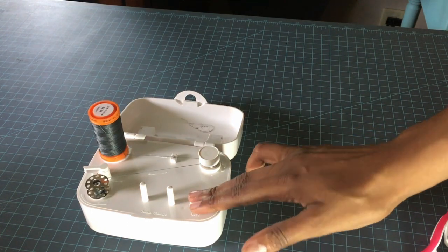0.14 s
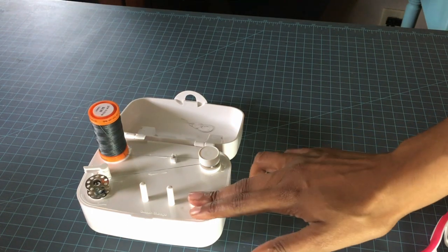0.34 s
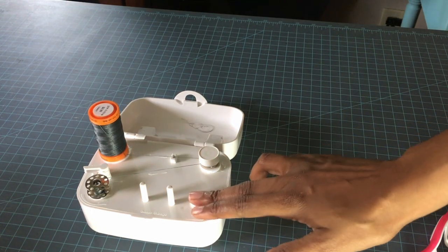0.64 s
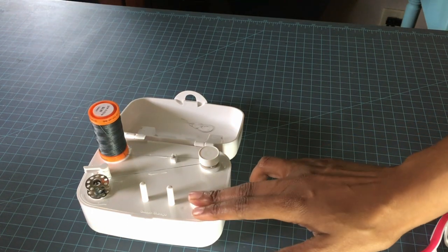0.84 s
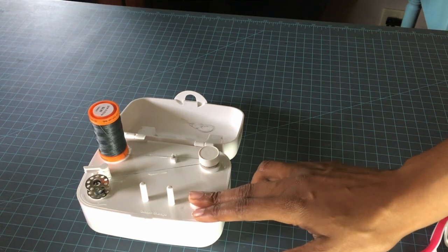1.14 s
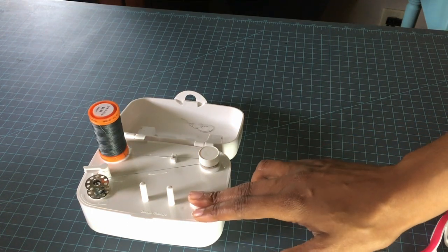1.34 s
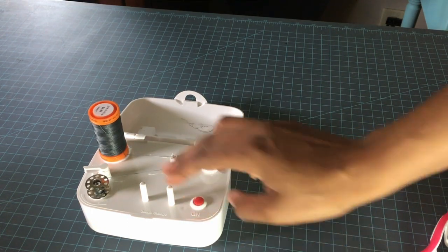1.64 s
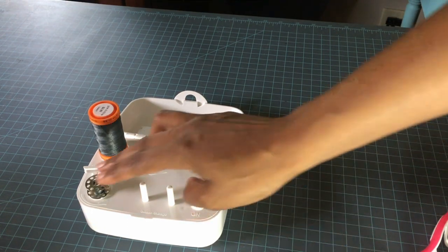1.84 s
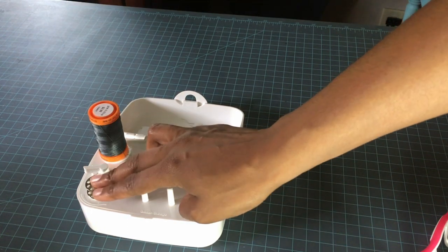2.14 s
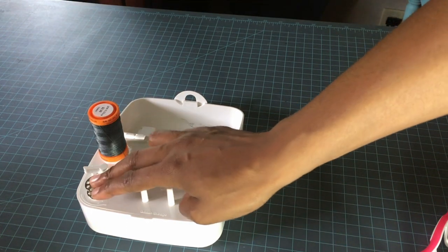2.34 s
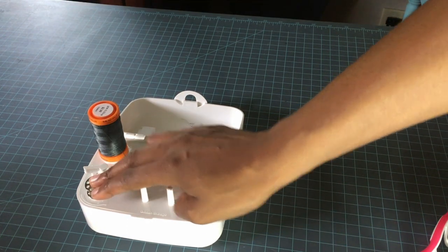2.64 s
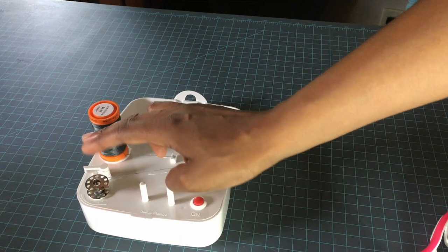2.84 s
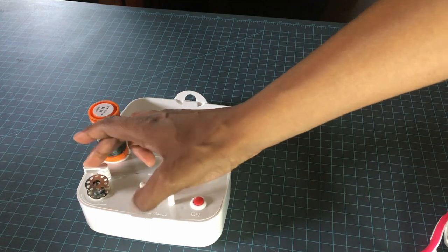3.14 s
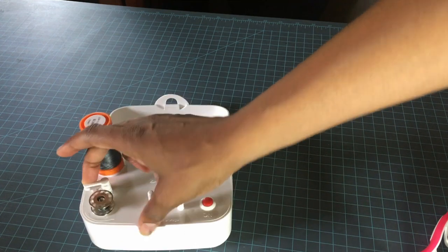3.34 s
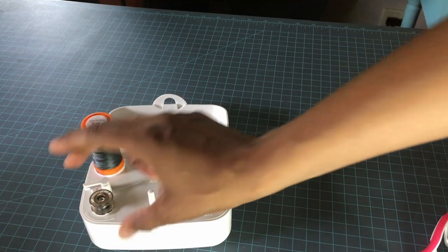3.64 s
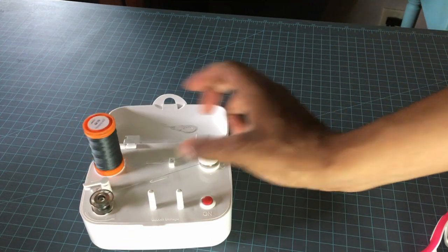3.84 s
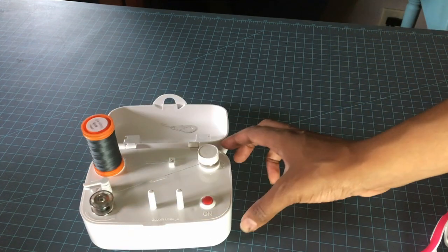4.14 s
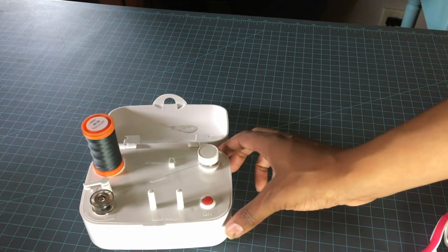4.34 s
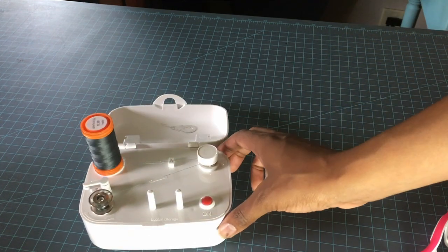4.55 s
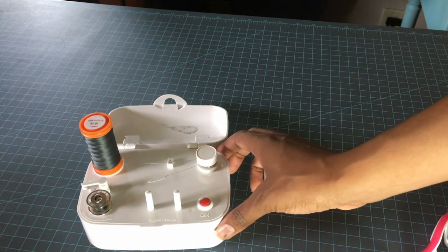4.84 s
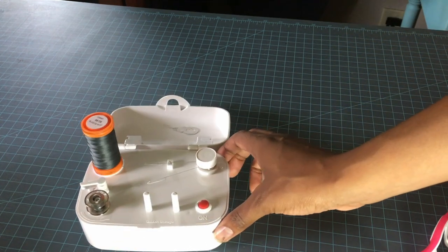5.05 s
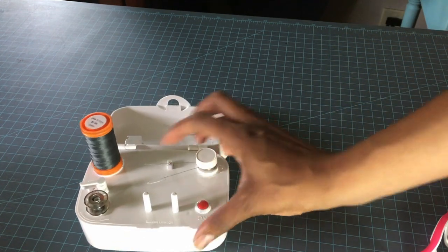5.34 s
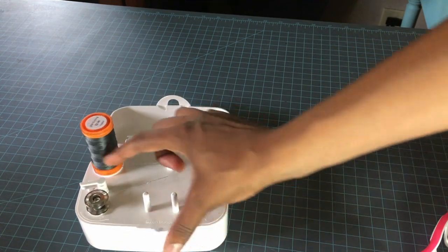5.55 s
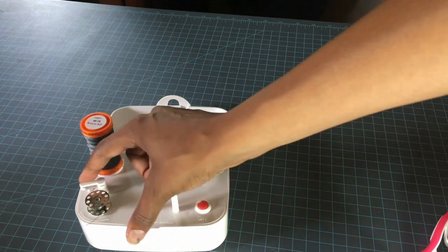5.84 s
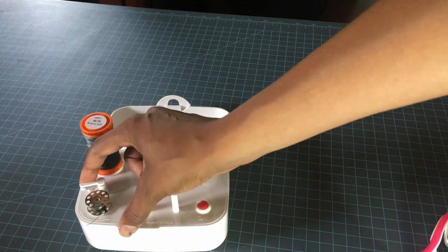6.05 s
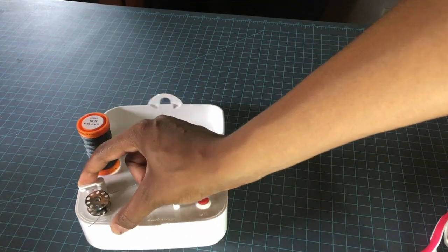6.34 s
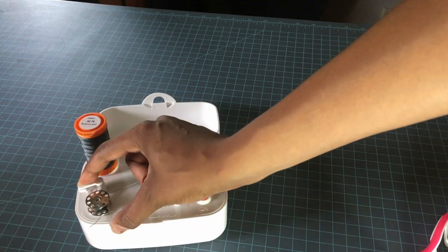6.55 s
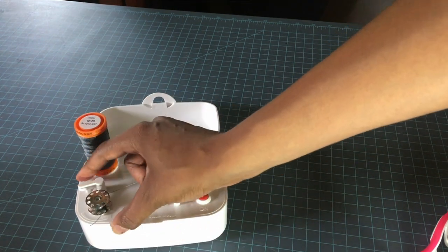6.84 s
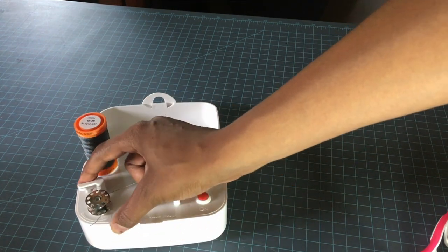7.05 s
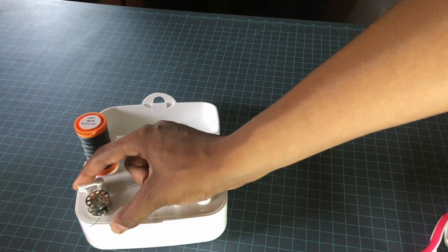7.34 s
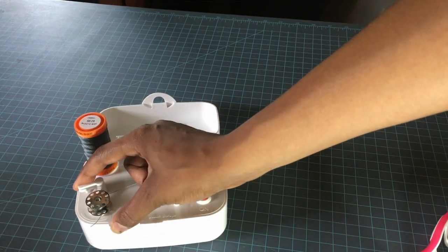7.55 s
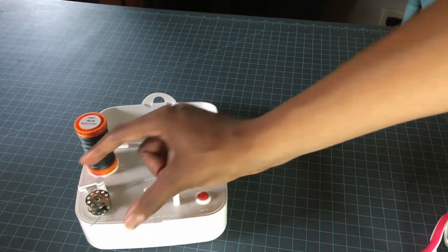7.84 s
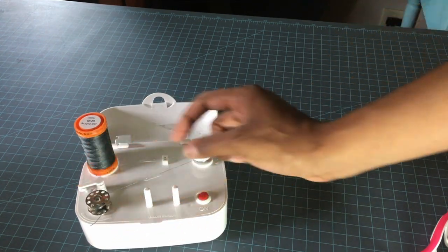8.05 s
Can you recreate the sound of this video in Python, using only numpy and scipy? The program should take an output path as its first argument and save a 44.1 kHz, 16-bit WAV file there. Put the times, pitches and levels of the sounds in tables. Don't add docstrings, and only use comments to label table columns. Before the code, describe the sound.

Close up on a table in a quiet room, a button on a hollow plastic casing clicks sharply four times, with fainter clicks between. Soft fingertip touches follow, then a small geared motor starts slowly, speeds up to a rough buzzing whirr with a loose bobbin snapping, drops to a weaker idle and stops. Afterwards come a brief scrape on the mat and a few light lever clicks.

```python
import sys
import numpy as np
from scipy import signal
from scipy.fft import rfft, irfft, next_fast_len
from scipy.io import wavfile
from scipy.ndimage import uniform_filter1d

SR = 44100
rng = np.random.default_rng(int(sys.argv[2]) if len(sys.argv) > 2 else 0)


def magnitude_from_level(level_db):
    exponent = np.asarray(level_db, float) / 20
    return 10 ** exponent


def dump_mix(stems):
    frames = np.atleast_2d(stems).T
    limited = np.clip(frames, -1, 1)
    pcm = np.round(limited * 32767).astype(np.int16)
    wavfile.write(sys.argv[1], SR, pcm)


N = 361619
LEAD = SR // 4

# pitch_hz, width_hz, knocked_db, shaken_by_motor_db
CASING = [(282.8, 36, -5.5, -2.5), (477, 120, -17.5, -23.5), (796, 88, -4.5, -9.5), (927, 160, 6, -9.5),
          (1060, 210, -14, -5.5), (1123.5, 75, -8, -2), (1320, 26, -6, 2.5), (1644, 81, -3.5, -12),
          (1745, 70, -4, -6), (2022, 37, -9.5, 0), (2200, 54, -10, -1), (2456, 54, -6.5, -3.5),
          (2858, 60, -10.5, -2), (3334, 110, -7, -9), (4120, 160, -4.5, -42.5), (5020, 430, 1, -17.5),
          (5663, 250, 3.5, -12), (5800, 430, -1, -30), (7470, 250, -1, -20.5), (8100, 350, -3.5, -23.5),
          (10100, 350, -4.5, -20), (11000, 2700, -16, -25.5)]
# pitch_hz, density_db_per_hz
WHIRR_COLOUR = [(100, -65), (170, -32.5), (283, -5.5), (369, -11), (518, -5.5), (614, -16), (1040, -6.5),
                (1840, -6.5), (3690, -15.5), (8470, -21), (15500, -43.5)]
# time_s, depth_db
THROB_DEPTH = [
    (3.5, 0),
    (3.75, 0.5),
    (4.0, 0),
    (4.45, 0.5),
    (4.7, -0.5),
]
THROB_HZ, THROB_PEAK_S = 11.96, 4.09
FLARE_HZ, FLARE_DB, FLARE_PEAK_S = 1730, 10, 4.115
WAKING_HZ, WAKING_DB = 1320, 6
BASS_WAKES_S, BASS_WAKE_LENGTH_S, BASS_LATE_DB = 3.58, 0.1, -3
BROAD_LATE_DB = -2


def motor():
    casing_db, rattle_db, hum_db = running()
    waking = in_time([(BASS_WAKES_S, 1), (BASS_WAKES_S + BASS_WAKE_LENGTH_S, 0)])[0]
    t = np.arange(N) / SR
    turn = 2 * np.pi * THROB_HZ * (t - THROB_PEAK_S)
    throb_db = in_time(THROB_DEPTH)[0] * (np.cos(turn) + 1.1 * np.cos(2 * turn))
    throb_db += 1.68 * (1 - 0.7 * waking) * drift(28)
    flare_db = FLARE_DB * np.cos(2 * np.pi * THROB_HZ * (t - FLARE_PEAK_S))

    shake = grit(16000, spread_db=3.0)
    rings = 0
    for k, (hz, width, _, shaken_db) in enumerate(CASING):
        near_flare = np.exp(-(np.log(hz / FLARE_HZ) / 0.11) ** 2)
        near_waking = np.exp(-(np.log(hz / WAKING_HZ) / 0.08) ** 2)
        uneven_db = 2.3 * drift(5.1) + 2.85 * drift(45)
        panel_db = uneven_db + flare_db * near_flare + WAKING_DB * waking * near_waking
        rings = rings + (-1) ** k * magnitude_from_level(panel_db) * resonate(shake, [(hz, width, shaken_db)])

    broad = coloured(grit(16000, spread_db=1.5), WHIRR_COLOUR)
    body = rms_one(rings) + magnitude_from_level(BROAD_LATE_DB * waking) * broad
    low, high = split(body, 3500)
    bass, middle = split(low, 630, order=2)
    low = magnitude_from_level(BASS_LATE_DB * waking) * bass - middle
    whirr = rms_one(low) + magnitude_from_level(rattle_db) * rms_one(high)
    return magnitude_from_level(casing_db - 0.5 + throb_db) * whirr, magnitude_from_level(hum_db + 1.74) * table_hum()


# time_s, level_db
LOAD = [
    (3.282, -53.5),
    (3.43, -55.5),
    (3.66, -46.5),
    (3.95, -41.5),
    (4.4, -41.5),
    (4.65, -43.5),
    (4.71, -50),
    (5.269, -52.5),
    (5.73, -55.5),
]
# peak_s, level_db, half_length_s
CATCHES = [(3.46, 11.5, 0.15), (3.59, 0.5, 0.044), (3.752, 2, 0.048), (3.828, -5.5, 0.034),
           (3.948, 5, 0.02), (4.2, 2, 0.034), (4.28, 3, 0.026), (4.375, 5.5, 0.025), (4.98, 2, 0.046),
           (5.09, -1, 0.1), (5.23, 2.5, .05), (5.322, -10, 0.044), (5.408, 7, 0.038), (5.65, -13.5, 0.048)]
SPIN_UP_DB_PER_S, RUN_DOWN_DB_PER_S = 484.5, 165.5
RATTLE_DB, RATTLE_LAG = -14.5, 0.3
SQUEAL_S, SQUEAL_DB, SQUEAL_HALF_S = 3.34, 10, 0.062
TABLE_HUM_DB, TABLE_HUM_SHARE = -28.5, 0.64
BEAT_HZ, BEAT_PEAK_S, BEAT_DB, BEAT_FADE_S = 7.23, 3.8, 5, 0.6


def running():
    t, start, stop = np.arange(N) / SR, LOAD[0][0], LOAD[-1][0]
    load_db, = in_time(LOAD)
    ends_db = -SPIN_UP_DB_PER_S * np.maximum(start - t, 0) - RUN_DOWN_DB_PER_S * np.maximum(t - stop, 0)
    catch_db = sum(swell(s, db, half, half) for s, db, half in CATCHES)
    squeal_db = swell(SQUEAL_S, SQUEAL_DB, SQUEAL_HALF_S, SQUEAL_HALF_S)
    rattle_db = RATTLE_DB - RATTLE_LAG * catch_db + squeal_db
    beat_fade = np.exp(-np.maximum(t - start, 0) / BEAT_FADE_S)
    beat_db = BEAT_DB * beat_fade * np.cos(2 * np.pi * BEAT_HZ * (t - BEAT_PEAK_S))
    hum_db = TABLE_HUM_DB + TABLE_HUM_SHARE * load_db + beat_db + ends_db
    return load_db + catch_db + ends_db, rattle_db, hum_db


# start_s, peak_db
SNAPS = [(3.3992, -47), (3.497, -52), (3.6277, -48), (3.7419, -52.5), (3.9444, -39), (4.1051, -40),
         (4.1944, -43), (4.2844, -44), (4.364, -36), (4.4594, -42), (4.5544, -39), (4.722, -43),
         (5.4194, -49)]


def snaps():
    out, t = np.zeros(N), np.arange(SR // 40) / SR
    for s, db in SNAPS:
        out[round(s * SR):][:len(t)] += magnitude_from_level(db - 3.5) * np.exp(-t / 0.0017) * rng.standard_normal(len(t))
    bright = split(out + 1e-18, 4010, order=2)[1]
    return split(bright, 9200, order=3)[0]


SNAP_ABOVE_HZ = 2300


def knocks():
    out, t = np.zeros((2, N + LEAD + SR)), np.arange(SR // 16) / SR
    hz, width, level_db = np.transpose(CASING)[:3, :, None]
    for s, peak_db, own_hz, low_db, high_db, _ in contacts():
        luck = rng.standard_normal((3, len(CASING), 1))
        late = np.maximum(t - 0.0018 * abs(luck[0]), 0)
        waves = magnitude_from_level(level_db) * np.sign(luck[2]) * np.sin(2 * np.pi * hz * late)
        own = np.sin(2 * np.pi * own_hz * t)
        crack = np.exp(-t / 0.003) * rng.standard_normal(len(t))

        direct = (magnitude_from_level(1.9 * luck[1]) * waves * np.exp(-np.pi * 1.3 * width * late)).sum(0)
        direct += magnitude_from_level(4.0) * np.exp(-t / 0.0037) * own + magnitude_from_level(-2.5) * crack
        blurred = (waves * np.exp(-np.pi * 4 * width * late)).sum(0) + np.exp(-t / 0.002) * own
        blurred += magnitude_from_level(11.0) * np.exp(-t / 0.0005) * crack
        blurred += magnitude_from_level(-8.0) * np.exp(-t / 0.003) * own * (own_hz < SNAP_ABOVE_HZ)

        low, rest = split(np.array([direct, blurred]), 950)
        low = split(low, 390, order=2)[1]
        middle, high = split(rest, 2900)
        high = split(high, 10500, order=2)[0]
        soft_db = 0.92 * min(peak_db + 49.0, 0)
        high_gain = magnitude_from_level(np.array([[high_db + 7.5], [0.76 * high_db + 2.5]]) + soft_db)
        low_gain = magnitude_from_level(np.array([[low_db + 6.5], [0.79 * low_db + 1.5]]))
        sound = low_gain * low + middle + high_gain * high
        sound[1] *= np.sqrt(np.sum(sound[0] ** 2) / np.sum(sound[1] ** 2))
        at = round(s * SR) + LEAD
        out[:, at:at + len(t)] += magnitude_from_level(peak_db) * sound / abs(sound[0]).max()
    return out[:, :N + LEAD]


# start_s, peak_db, ring_hz, low_modes_db, high_modes_db
EARLIER_KNOCK = [
    (-0.082, -18, 1320, -25, -5.5),
]
# start_s, peak_db, ring_hz, low_modes_db, high_modes_db
CLICKS = [(0.18, -47.5, 2200, -39, -12), (0.229, -16, 2400, -12.5, -6), (0.28, -42, 2260, -1, -15),
          (0.314, -35.5, 1370, -8, -21), (0.922, -15.5, 1284, -14.5, -25.5),
          (1.262, -17, 2400, -13.5, -8.5), (1.504, -16.5, 1310, -12, -18.5),
          (1.554, -34.5, 1185, -13, -15.5), (2.463, -44, 1008, 15, -43), (2.533, -48.5, 870, -7.5, -15),
          (3.009, -34.5, 1780, -13, -14), (3.035, -44, 1790, -24, -28.5), (5.369, -40.5, 1450, -1, -21),
          (5.854, -42, 1363, -7, -35), (6.647, -40, 1255, -23, -58.5), (7.162, -46, 1320, -17.5, -18.5),
          (7.647, -28.5, 1320, -35.5, -31.5)]
# start_s, peak_db, ring_hz, table_thump_db
TOUCHES = [(0.098, -65.5, 865, -86), (0.563, -57.5, 800, -75.5), (0.571, -60, 1824, -74),
           (2.035, -61, 1220, -70.5), (2.411, -69.5, 844, -71.5), (2.719, -66, 940, -59.5),
           (2.763, -58.5, 890, -58), (2.778, -62, 1060, -76), (6.524, -64, 1450, -84),
           (6.541, -63.5, 1465, -76.5), (6.581, -65, 875, -71.5), (6.611, -60.5, 877, -72.5),
           (6.85, -72, 900, -82), (6.882, -64.5, 1350, -77.5), (7.036, -66.5, 1774, -84),
           (7.408, -65.5, 1300, -77), (8.189, -73, 937, -64.5)]
TOUCH_LOW_DB, TOUCH_HIGH_DB = -6, -16
THUMP_DB, THUMP_SHARE = -36, 0.52
SNAP_THUMP_DB = -11


def contacts():
    struck = []
    for s, peak_db, ring_hz, low_db, high_db in EARLIER_KNOCK + CLICKS:
        thump_db = THUMP_DB + THUMP_SHARE * (peak_db + low_db) + SNAP_THUMP_DB * (ring_hz > SNAP_ABOVE_HZ)
        struck.append((s, peak_db, ring_hz, low_db, high_db, thump_db))
    for s, peak_db, ring_hz, thump_db in TOUCHES:
        struck.append((s, peak_db, ring_hz, TOUCH_LOW_DB, TOUCH_HIGH_DB, thump_db))
    return sorted(struck)


# time_s, level_db
NUDGE = [
    (6.22, -98),
    (6.226, -77),
    (6.248, -84),
    (6.308, -60.5),
    (6.414, -57),
    (6.484, -100),
    (6.52, -79),
]
# pitch_hz, width_hz, level_db
NUDGE_RINGS = [(523, 54.2, -5.5), (1090, 22, -1), (1370, 37, 0.5), (2730, 82, -7.5), (2980, 52, -5),
               (5550, 22, -28), (7370, 150, -15.5), (8460, 100, -25), (10400, 63, -21), (11570, 79, -24.5)]


def nudge():
    before, after = (NUDGE[0][0] - 0.03, -120), (NUDGE[-1][0] + 0.028, -120)
    level_db, = in_time([before] + NUDGE + [after])
    slip = grit(6000, spread_db=2.5)
    broad = rms_one(resonate(slip, [(863, 880, 0.5), (7150, 3500, -14.0)]))
    feet = rms_one(rms_one(resonate(slip, NUDGE_RINGS)) + magnitude_from_level(-8) * broad)
    return magnitude_from_level(level_db - 3.0) * feet, magnitude_from_level(level_db - 10) * table_hum()


# start_s, top_db, panel_db
PUSHES = [(0.234, -44.5, -57), (0.613, -64, -69), (0.726, -68.5, -78), (1.458, -64, -64),
          (2.139, -69.5, -81), (2.384, -55, -80), (2.643, -75, -68), (2.909, -71.5, -74.5),
          (3.017, -47.5, -62), (3.229, -57, -71), (6.059, -72.5, -85), (6.226, -56, -74), (6.586, -63, -74),
          (6.896, -62.5, -83.5), (6.949, -66, -77), (7.228, -72, -83), (7.581, -59, -84),
          (7.641, -58, -55.5)]
TABLE_HZ = 128.7


def table_top():
    out, t = np.zeros(N + SR), np.arange(SR // 5) / SR
    thumps = [(k[0], k[5] + 7, k[5] - 3) for k in contacts()[1:]]
    for s, top_db, panel_db in thumps + PUSHES:
        detune = 1 + 0.03 * rng.standard_normal(3)
        boom = magnitude_from_level(top_db) * np.exp(-t / 0.023) * np.sin(2 * np.pi * TABLE_HZ * detune[0] * t)
        for panel_hz, off in zip((210, 310), detune[1:]):
            boom += magnitude_from_level(panel_db) * np.exp(-t / 0.019) * np.sin(2 * np.pi * panel_hz * off * t)
        at = round(s * SR)
        out[at:at + len(t)] += (1 - np.exp(-t / 0.0031)) * boom
    return out[:N]


def table_hum():
    return rms_one(resonate(rng.standard_normal(N), [(TABLE_HZ, 22, 0), (195, 30, -8)]))


# time_s, level_db
ROCKING = [(0, -46), (.36, -43), (.43, -36.5), (.62, -39), (1.0, -48), (1.55, -44), (1.98, -48.5),
           (2.5, -33.5), (3.22, -38), (3.45, -31.5), (3.68, -23), (3.85, -33.5), (5.2, -37.5), (5.8, -46),
           (6.37, -36.5), (6.96, -35.5), (7.4, -36), (8.2, -50.5)]
# peak_s, level_db
JOLTS = [(0.0, -52), (0.321, -40), (0.98, -50.5), (1.3, -56.5), (1.57, -45), (2.08, -40), (2.4, -46.5),
         (2.58, -45), (2.7, -46), (2.81, -50.5), (3.11, -46.5), (3.38, -30), (3.54, -41), (3.63, -34),
         (3.9, -40.5), (4.1, -40.5), (4.24, -40), (4.56, -45), (4.75, -44), (5.04, -42.5), (5.209, -41.5),
         (5.399, -53), (5.55, -64), (5.78, -49), (6.26, -43.5), (6.4, -49.5), (6.92, -42), (7.35, -50.5),
         (7.69, -49)]
# pitch_hz, width_hz, level_db
SWAY_MODES = [(12.02, 4, 5.5), (25.5, 9, -3.5)]
LEG_MODES = [(43.64, 2.6, 0)]
BRACE_MODE = [(83, 14, 0)]
LEGS_REST_DB, JOLT_RISE_DB_PER_S, JOLT_FALL_DB_PER_S = -68, 200.5, 152.5
JOLT_ROCKS = 0.05


def sway():
    rocking_db, = in_time(ROCKING)
    jolts_db = []
    for s, db in JOLTS:
        lift_db = max(db - LEGS_REST_DB, 1)
        jolts_db.append(swell(s, lift_db, lift_db / JOLT_RISE_DB_PER_S, lift_db / JOLT_FALL_DB_PER_S))
    lift_db = np.max(jolts_db, axis=0)
    legs_db = LEGS_REST_DB + lift_db
    even = []
    for modes in (SWAY_MODES, LEG_MODES):
        slow = rms_one(resonate(resonate(rng.standard_normal(N + SR), modes), modes)[SR:])
        even.append(slow / np.sqrt(uniform_filter1d(slow ** 2, size=SR // 6) + 0.23))
    motion = magnitude_from_level(rocking_db - 1.0 + JOLT_ROCKS * lift_db) * even[0] + magnitude_from_level(legs_db) * even[1]
    low_motion = split(motion, 75)[0]
    brace = rms_one(resonate(rng.standard_normal(N), BRACE_MODE))
    return low_motion + magnitude_from_level(0.6 * legs_db - 40.5) * brace


# pitch_hz, t60_s
ROOM_T60 = [(100, 0.5), (700, 0.25), (1800, 0.28), (5000, 0.28), (13000, 0.077)]


def room(x):
    t, echo = np.arange(SR // 2) / SR, 0
    for hz in 90 * 2. ** np.arange(8):
        octave = signal.butter(2, [hz / np.sqrt(2), hz * np.sqrt(2)], "band", fs=SR, output="sos")
        decay = magnitude_from_level(-60 * t / at_hz(ROOM_T60, hz)) + magnitude_from_level(-17.5 - 60 * t / 0.45)
        echo = echo + signal.sosfilt(octave, rng.standard_normal(len(t))) * decay
    echo *= np.clip((t - 0.002) / 0.0045, 0, 1)
    return magnitude_from_level(-9.5) * signal.fftconvolve(x, echo / np.sqrt(np.sum(echo ** 2)))[:len(x)]


# start_s, peak_db
TICKS = [
    (0.753, -39),
    (2.076, -39.5),
    (7.37, -54),
]


def ticks():
    out = np.zeros(N)
    for s, db in TICKS:
        out -= magnitude_from_level(db - 2.0) * np.exp(-((np.arange(N) / SR - s - 0.0005) / 0.00003) ** 2)
    return out


# pitch_hz, density_db_per_hz
HISS = [(35, -27), (60, 4.5), (193, -10), (380, -16), (924, -20), (1060, -24), (1200, -19.5), (1620, -23),
        (2410, -26), (16000, -30.5)]
# pitch_hz, rms_db
HUM = [(72, -81), (1077, -100)]


def noise_floor():
    lines = sum(magnitude_from_level(db + 3.0) * np.sin(2 * np.pi * hz * np.arange(N) / SR) for hz, db in HUM)
    return magnitude_from_level(-81.5 + 4.0) * coloured(rng.standard_normal(N), HISS) + lines


def grit(per_s, spread_db):
    sizes = magnitude_from_level(spread_db * np.minimum(rng.exponential(1, N), 4)) * rng.standard_normal(N)
    return sizes * (rng.random(N) < per_s / SR) + 1e-18


def resonate(x, modes):
    out = 0
    for k, (hz, width, db) in enumerate(modes):
        r = np.exp(-np.pi * abs(width) / SR)
        a = [1, -2 * r * np.cos(2 * np.pi * hz / SR), r * r]
        b = [(1 - r * r) / 2, 0, (r * r - 1) / 2]
        out = out + (-1) ** k * magnitude_from_level(db) * signal.lfilter(b, a, x)
    return out


def coloured(x, spectrum):
    size = next_fast_len(len(x))
    gain = magnitude_from_level(at_hz(spectrum, np.fft.rfftfreq(size, 1 / SR)))
    return rms_one(irfft(rfft(x, size) * gain, size)[:len(x)])


def split(x, hz, order=5):
    return [signal.sosfilt(signal.butter(order, hz, kind, fs=SR, output="sos"), x) for kind in ("low", "high")]


def drift(rate_hz):
    lowpass = signal.butter(1, rate_hz, fs=SR / 64, output="sos")
    slow = signal.sosfiltfilt(lowpass, rng.standard_normal(N // 64 + 2))
    return np.interp(np.arange(N) / 64, np.arange(len(slow)), rms_one(slow))


def swell(s, db, before_s, after_s):
    return in_time([(s - before_s, 0), (s, db), (s + after_s, 0)])[0]


def in_time(rows):
    s, *columns = np.transpose(rows)
    return [np.interp(np.arange(N) / SR, s, c) for c in columns]


def at_hz(points, hz):
    points_hz, values = np.transpose(points)
    return np.interp(np.log(hz + 1e-3), np.log(points_hz), values)


def rms_one(x):
    return x / np.sqrt(np.mean(x ** 2) + 1e-20)


def scene():
    casing = knocks()
    (whirr, hum), (slip, rumble) = motor(), nudge()
    casing[:, LEAD:] += whirr + slip + snaps()
    airborne = (casing[0] + room(casing[1]))[LEAD:]
    table = table_top() + hum + rumble + sway()
    return (airborne + table + ticks() + noise_floor())[None]


# centre_s, level_db, above_hz
STARVED = [(.62, -14, 2500), (1.15, -14, 3000), (1.535, -9, 3300), (1.665, -14, 6000), (2.01, -12, 1500),
           (2.135, -14, 1800), (2.54, -14, 4600), (2.735, -16, 2500), (4.878, -35, 3300),
           (4.998, -22, 3300), (5.275, -28, 3300), (5.53, -16, 3300), (5.698, -30, 3300), (6.34, -16, 3300),
           (6.595, -14, 2500), (6.96, -14, 3000), (7.13, -14, 2000), (7.172, -14, 4800), (7.535, -14, 1800)]


def starve(x):
    out, half = x.copy(), SR // 20
    dip = np.exp(-(np.arange(-half, half) / SR / 0.011) ** 4)
    for s, db, above_hz in STARVED:
        part = slice(round(s * SR) - half, round(s * SR) + half)
        highpass = signal.butter(4, above_hz, "high", fs=SR, output="sos")
        out[:, part] -= (1 - magnitude_from_level(db)) * dip * signal.sosfiltfilt(highpass, x[:, part])
    return out


def low_pass(x):
    return signal.sosfilt(signal.butter(12, 16480, fs=SR, output="sos"), x)


def record(dry):
    lowpass = signal.cheby2(16, 50, 15900, fs=SR, output="sos")
    mix = starve(signal.sosfilt(lowpass, dry))
    return low_pass(mix)


dry = scene()
out = record(dry)
dump_mix(out)
```